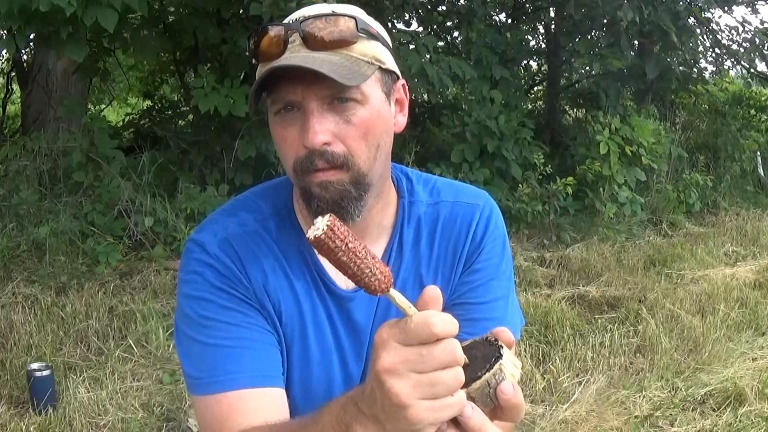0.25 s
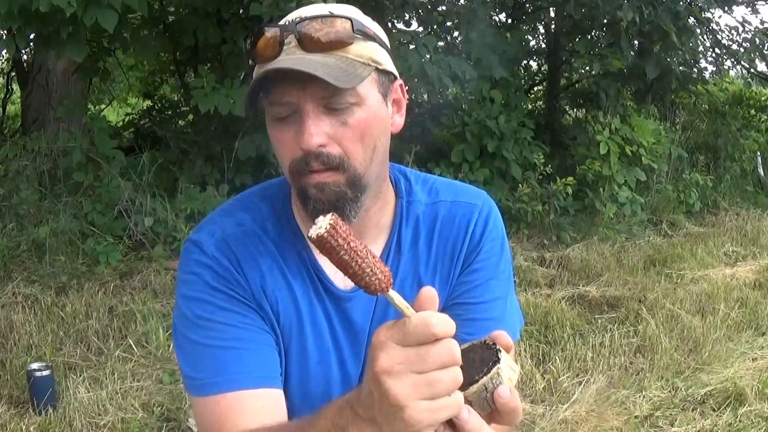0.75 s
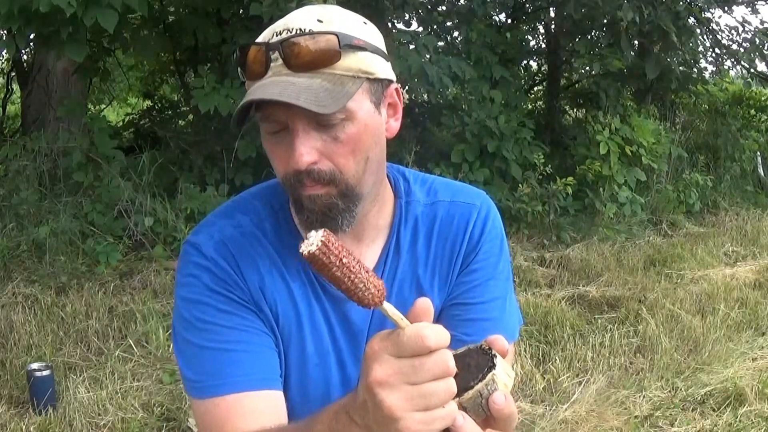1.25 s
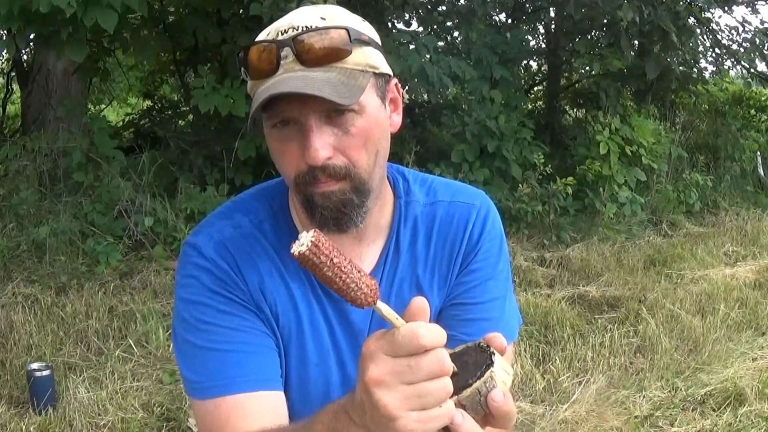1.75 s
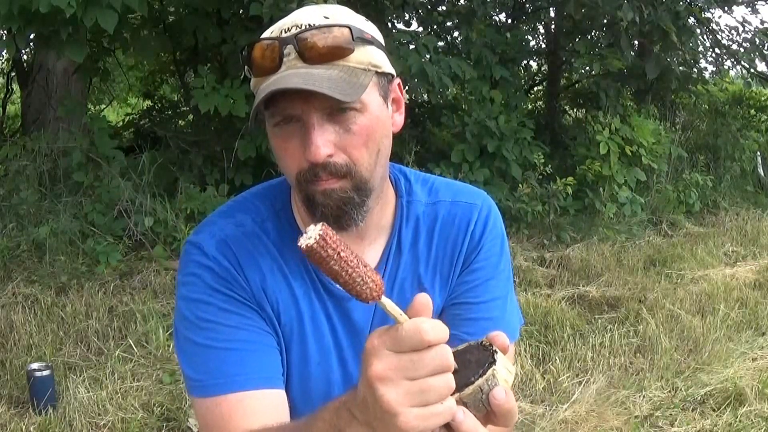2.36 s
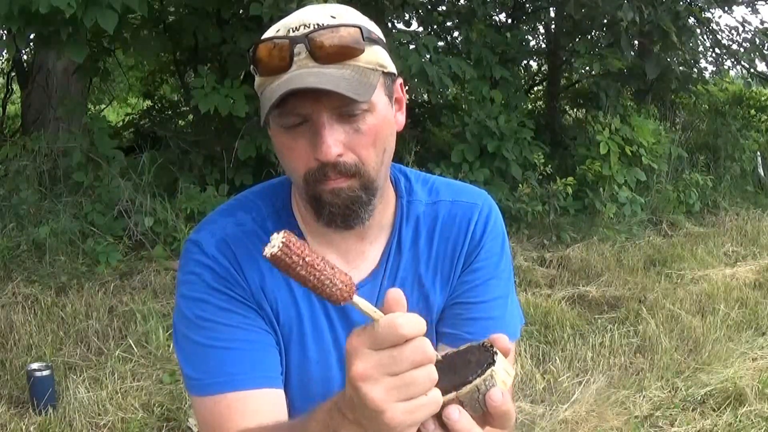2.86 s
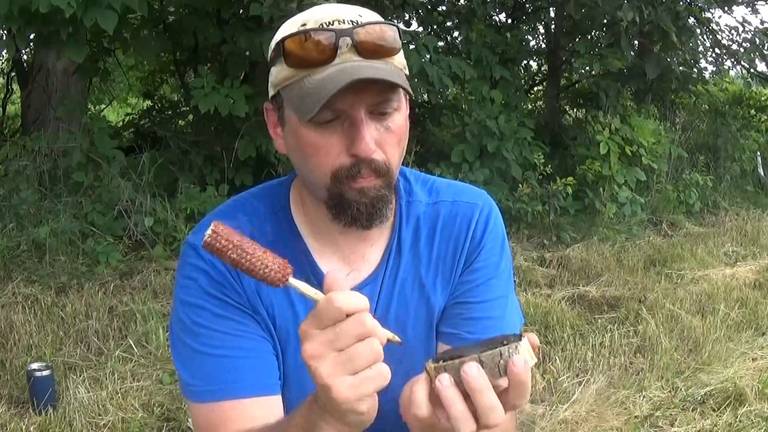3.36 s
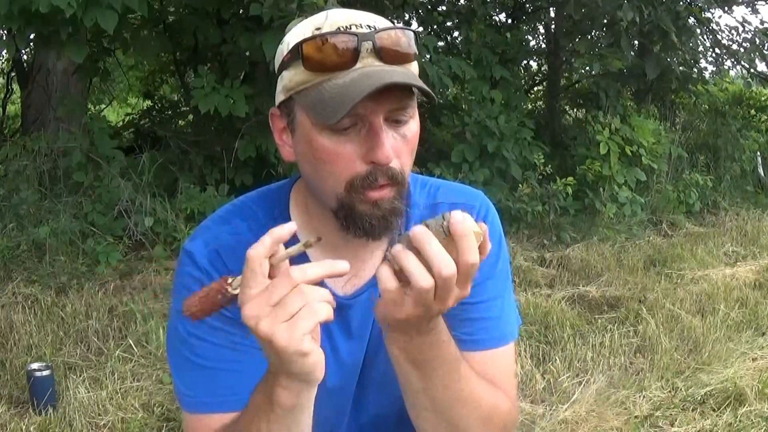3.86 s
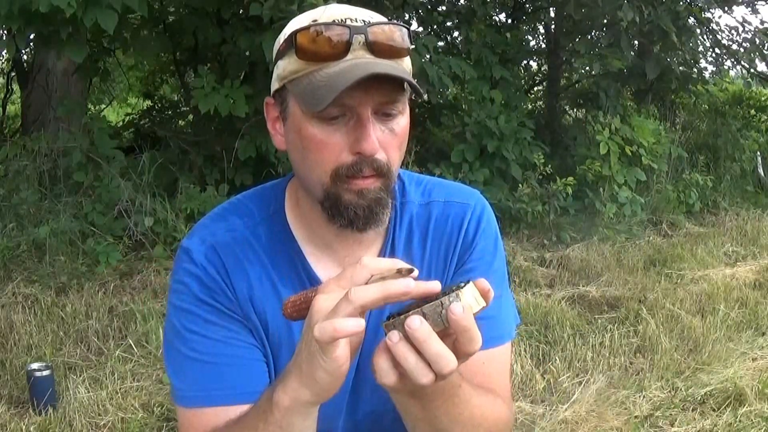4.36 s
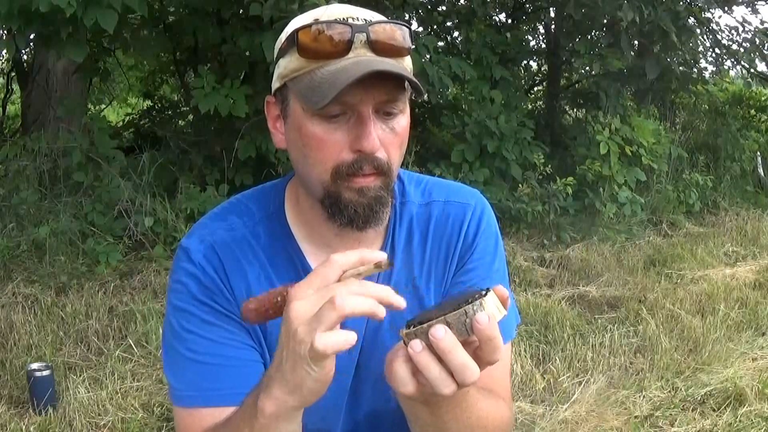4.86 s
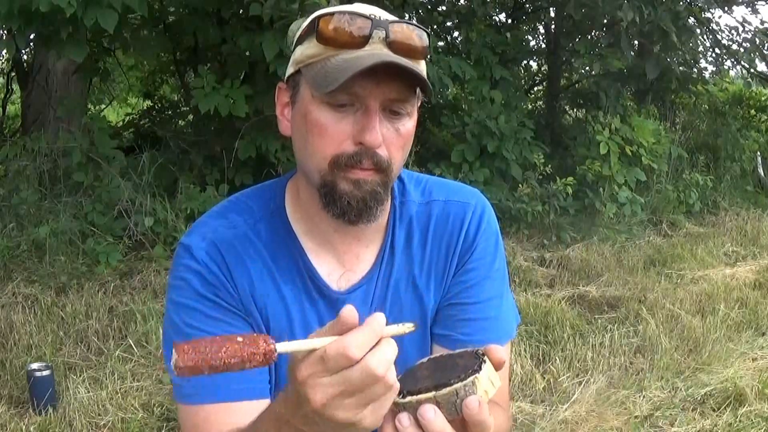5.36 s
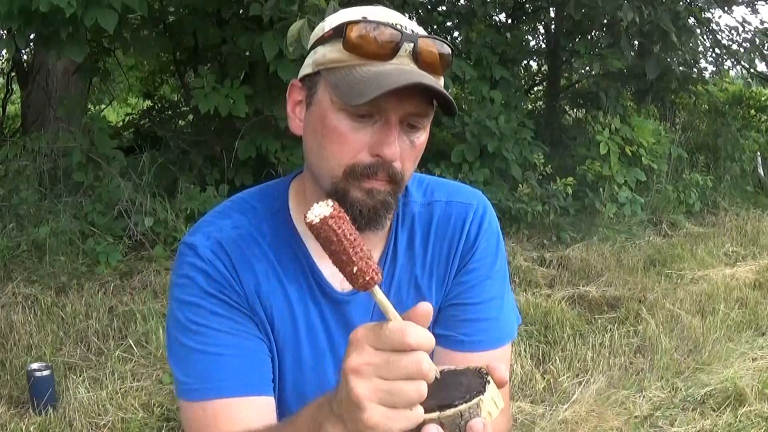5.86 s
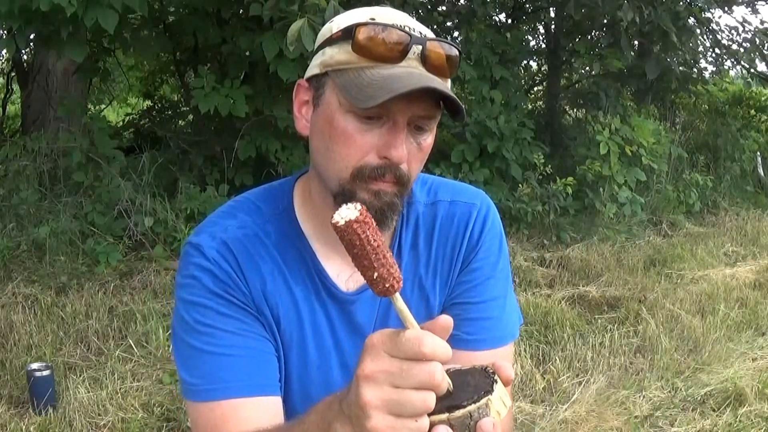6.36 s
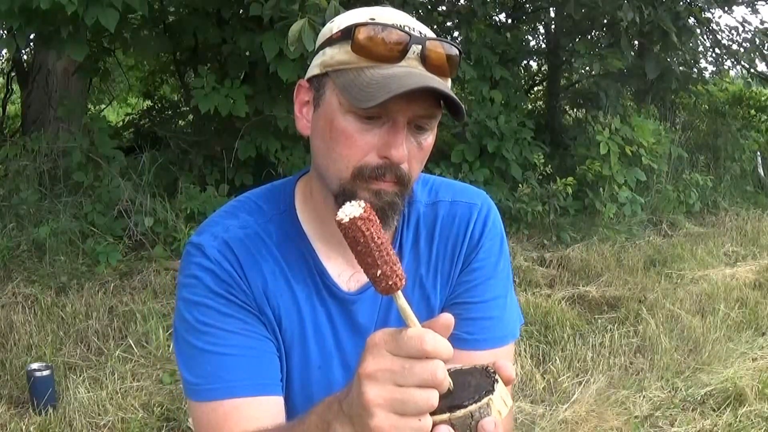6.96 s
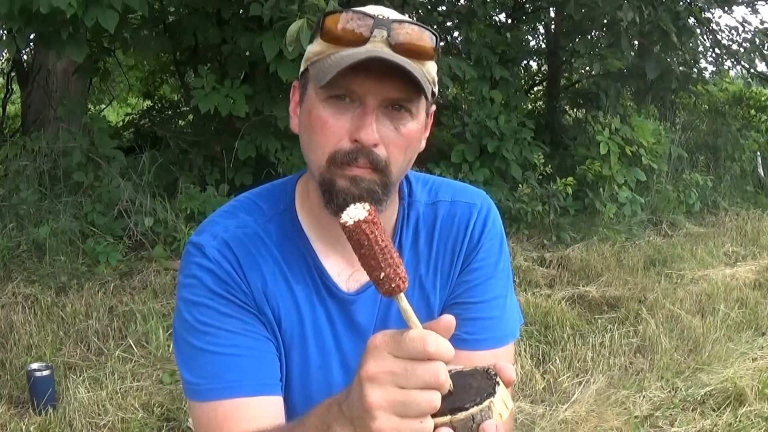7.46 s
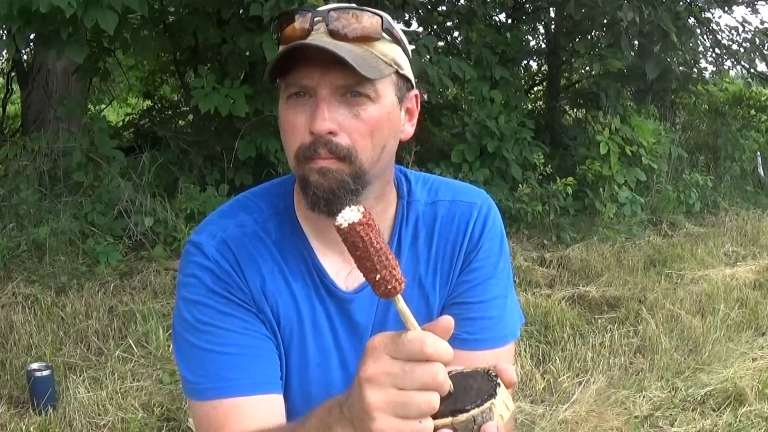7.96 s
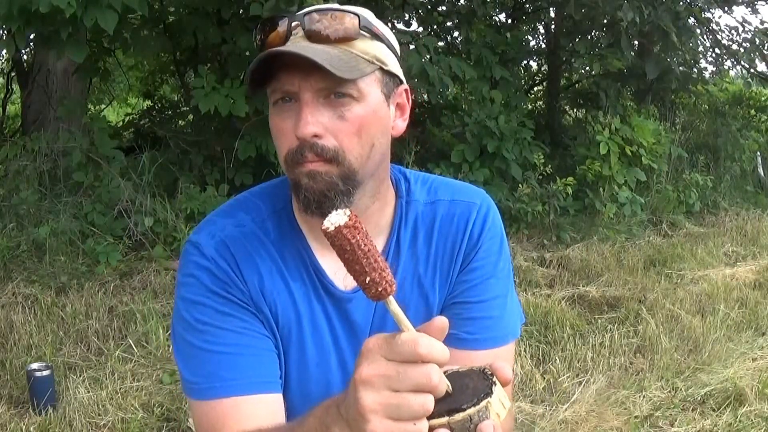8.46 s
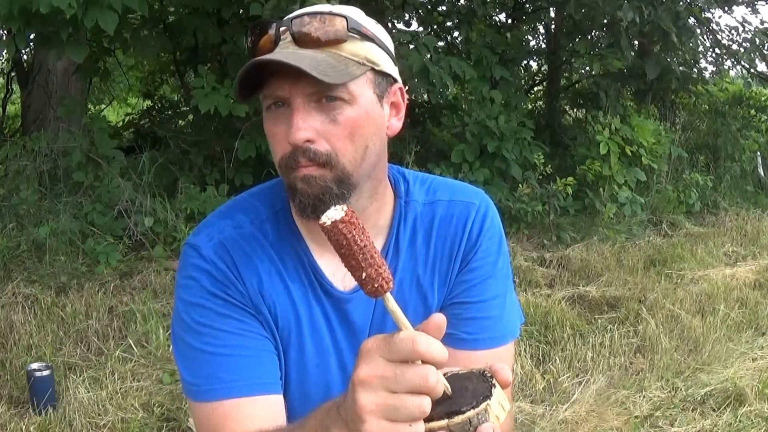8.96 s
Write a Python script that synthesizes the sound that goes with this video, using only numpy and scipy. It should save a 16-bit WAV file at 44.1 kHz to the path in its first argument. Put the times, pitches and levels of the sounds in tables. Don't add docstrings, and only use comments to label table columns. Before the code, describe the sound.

Ten brisk, raspy slate-and-peg yelps, a pause filled with near birdsong, then four quieter strokes outdoors among insects and rustling leaves.

```python
import sys
import numpy as np
from scipy import signal
from scipy.fft import rfft, irfft
from scipy.io import wavfile
from scipy.ndimage import uniform_filter1d

SR = 44100
rng = np.random.default_rng(int(sys.argv[2]) if len(sys.argv) > 2 else 0)


def master(y):
    cut = np.clip(np.atleast_2d(y).T, -1, 1)
    pcm = np.round(cut * 32767)
    wavfile.write(sys.argv[1], SR, pcm.astype(np.int16))


def to_linear_factor(level_db):
    exponent = np.asarray(level_db, float) / 20
    return 10 ** exponent


N = 406161

# time_s, pot_level_db, slip_rate_hz
STROKES = [
    [(0.209, -44.5, 561), (0.22, -33, 383), (0.236, -31.5, 329), (0.251, -31.5, 327), (0.266, -27.5, 394),
     (0.275, -30, 475), (0.284, -33, 637), (0.287, -48, 651)],
    [(0.484, -40.5, 539.5), (0.497, -31, 358.7), (0.515, -25, 376.6), (0.53, -28, 420), (0.544, -25, 475),
     (0.555, -28, 540), (0.566, -27.5, 645), (0.578, -40, 754)],
    [(0.767, -45, 599.6), (0.772, -35, 488), (0.78, -28, 375.5), (0.792, -28.5, 318.4), (0.801, -27, 322.7),
     (0.838, -26, 492), (0.854, -32.5, 660), (0.858, -46, 714)],
    [(1.049, -39, 588), (1.055, -31, 441), (1.068, -25.5, 320.5), (1.08, -26, 329), (1.095, -23, 404.5),
     (1.112, -25, 528), (1.124, -25.5, 673), (1.133, -37, 896)],
    [(1.318, -47, 533), (1.327, -33.5, 391), (1.335, -32, 342), (1.358, -28.5, 357.3), (1.385, -29, 430),
     (1.394, -28, 489), (1.403, -33.5, 655), (1.407, -47, 651)],
    [(1.614, -31.5, 604), (1.626, -28.5, 373), (1.638, -22, 370), (1.654, -24, 420), (1.663, -23.5, 487),
     (1.669, -22.5, 576), (1.677, -29, 860), (1.681, -45, 936)],
    [(1.896, -36, 562.5), (1.901, -32.5, 438.5), (1.912, -28.5, 340), (1.935, -22.5, 376),
     (1.953, -25.5, 521), (1.962, -24.5, 660), (1.968, -32, 861), (1.971, -41, 890)],
           [(2.163, -38, 556.5), (2.172, -28.5, 390.5), (2.185, -25, 335.6), (2.201, -21.5, 385.4),
     (2.221, -22.5, 503), (2.231, -24, 642), (2.24, -29, 800), (2.243, -39, 796)],
    [(2.486, -33, 484), (2.488, -25, 472), (2.493, -22.5, 425), (2.499, -24, 433), (2.512, -20.5, 485),
     (2.52, -23.5, 554), (2.528, -25.5, 730), (2.534, -38, 898)],
    [(2.772, -42, 528), (2.774, -37, 516), (2.779, -26, 436), (2.785, -23.5, 410), (2.794, -24.5, 396),
     (2.802, -28.5, 397), (2.817, -26.5, 489), (2.829, -38.5, 646)],
    [(6.954, -55, 704), (6.957, -40, 690), (6.968, -35, 583), (6.974, -33, 580), (6.984, -31, 613),
     (6.989, -37.5, 680), (6.996, -34.5, 804), (7.0, -56, 820)],
    [(7.462, -51, 602), (7.464, -35, 590), (7.471, -36.5, 471), (7.48, -34, 404), (7.492, -31, 491),
     (7.502, -34, 704), (7.506, -41, 900), (7.509, -53, 942)],
    [(7.891, -41, 605), (7.904, -29, 404.5), (7.911, -29.5, 383.5), (7.923, -31.5, 424), (7.949, -27, 656),
     (7.957, -33.5, 675), (7.97, -34, 790), (7.979, -44, 980)],
    [(8.334, -53, 606), (8.337, -34, 578), (8.346, -30, 388), (8.358, -31.5, 331), (8.374, -32, 355),
     (8.383, -28, 389), (8.4, -35, 672), (8.404, -47, 701)],]
# peg_re_pot_peak_db, slate_middle_db, slate_top_db
GRIPS = [(-7, -0.5, -2), (-9, -1.5, -2), (-7.5, 0, 0), (-8, 0.5, 2), (-12, -1, 4.5), (-11, 0, 3),
         (-9.5, 1, 1.5), (-11.5, 1, 4), (-19, 2.5, 3), (-17, 1.5, 2), (-11.5, -2, -0.5), (-9.5, -0.5, 0),
         (-7.5, 0.5, 0), (-6.5, 1, 0)]
# mode_hz, width_hz, first_grip_db, later_grip_db
SLATE_MIDDLE = [(3400, 370, -2.5, 7.5), (3490, 550, 0.5, 6), (4300, 550, 3, -1.5), (5000, 700, 0.5, -5.5),
                (5750, 460, 0.5, -8.5)]
SLATE_TOP = [(6300, 1400, 2.5, -1.1), (7000, 380, 0, -0.31), (7360, 480, 1, 0.13), (8260, 500, -3, 0.46)]
REGRIP_S = 5
POT_FLOOR_HZ = (350, 427)
HOLLOW_HZ, HOLLOW_WIDTH_HZ, HOLLOW_DEPTH = 2746, 570, (0.64, 0.18)


def strokes():
    out = np.zeros(N)
    chance = rng.standard_normal((len(GRIPS), 2, 9))
    slate = SLATE_MIDDLE + SLATE_TOP
    for curve, (peg_db, *slate_db), (shift, more) in zip(STROKES, GRIPS, chance):
        late = int(curve[0][0] > REGRIP_S)
        modes = [(hz * (1 + 0.03 * a), width_hz, dbs[late] + b)
                 for (hz, width_hz, *dbs), a, b in zip(slate, shift, more)]
        bands = modes[:len(SLATE_MIDDLE)], modes[len(SLATE_MIDDLE):]
        at, sound = stroke(motion(curve, peg_db, late), bands, peg_modes(late), slate_db)
        floor = signal.butter(5, POT_FLOOR_HZ[late], "high", fs=SR, output="sos")
        sound = signal.sosfilt(floor, sound)
        hollow = HOLLOW_DEPTH[late] * resonate(sound, HOLLOW_HZ, HOLLOW_WIDTH_HZ)
        out[at:at + len(sound)] += sound - hollow
    return out


PEG_DB_PER_OCTAVE = (-16, -6.5)


def motion(curve, peg_db, late):
    s, db, hz = np.transpose(curve)
    pressure_db = 0.7 * (db - db.max())
    quick_db = PEG_DB_PER_OCTAVE[late] * np.log2(hz / hz.min())
    peg = db.max() + peg_db + pressure_db + quick_db
    t = np.linspace(s[0], s[-1], num=40)
    return np.transpose([t, *(np.interp(t, s, column) for column in (db, hz, peg))])


# mode_hz, width_hz, level_db
POT = [(717, 139, -13), (1104, 170, -6.5), (1529, 271, -2.5), (1722, 212.5, 0), (1904, 114, 2),
       (2163, 73, -9.5), (2424, 126, -10.5)]
JITTER, UNEVEN_DB, GRIT_DB, POT_GRIT_DB, SLATE_GRIT = 0.004, 1.0, -6, -2.5, 0.8


def stroke(rows, slate_bands, shaft, slate_db):
    s, pot_db, slip_hz, peg_db = np.transpose(rows)
    t = s[0] - .03 + np.arange(7000) / SR
    slips, grit = slip_train(np.interp(t, s, slip_hz))
    push = slips + to_linear_factor(POT_GRIT_DB) * grit
    slips = slips + grit

    edges = np.r_[s[0] - .002, s, s[-1] + .002]
    pot = np.interp(t, edges, np.r_[0, to_linear_factor(pot_db), 0])
    peg = np.interp(t, edges, np.r_[0, to_linear_factor(peg_db), 0])
    place = np.clip((t - edges[0]) / (edges[-1] - edges[0]), 0, 1)
    firm = np.sin(np.pi * place ** 0.75).clip(0)

    above = signal.butter(3, 2900, "high", fs=SR, output="sos")
    scrape = slips + SLATE_GRIT * grit
    middle, top = (evened(signal.sosfilt(above, body(scrape, modes))) for modes in slate_bands)
    sound = pot * evened(body(push, POT), size=450)
    sound += to_linear_factor(3.0) * firm ** 0.49 * peg * evened(body(slips, shaft))
    sound += to_linear_factor(slate_db[0] - 12.5) * pot ** 0.65 * peg ** 0.28 * firm ** 0.5 * middle
    sound += to_linear_factor(slate_db[1] - 11.0) * pot ** 0.29 * peg ** 0.66 * firm * top
    return round(t[0] * SR), sound


def slip_train(slip_hz):
    chance = rng.standard_normal((2, len(slip_hz)))
    wobble = rms_one(uniform_filter1d(chance[0], size=120))
    hz = uniform_filter1d(slip_hz, size=180) * (1 + JITTER * wobble)
    turn = 2 * np.pi * np.cumsum(hz) / SR
    k = np.arange(1, 45)[:, None]
    slips = np.sum(np.cos(k * turn) * (k * hz < 13000), axis=0)
    slips *= to_linear_factor(UNEVEN_DB * wobble[::-1])
    grit = to_linear_factor(GRIT_DB) * chance[1] * (1 + np.cos(turn)) ** 2
    return slips, grit


# mode_hz, width_hz, first_grip_db, later_grip_db
PEG = [(9180, 440, -16, 2), (9460, 650, 0.5, 5), (10280, 570, 7, 4.5), (10930, 200, 7, 1.5)]


def peg_modes(late):
    return [(hz, width_hz, dbs[late]) for hz, width_hz, *dbs in PEG]


# start_s, length_s, level_db
DRAGS = [(.01, 0.11, -56), (0.313, 0.086, -56), (0.599, 0.042, -54.5), (0.885, 0.093, -55),
         (1.161, .1, -53), (1.437, 0.055, -50), (1.724, 0.069, -51), (2.002, 0.086, -50.5),
         (2.28, 0.079, -53), (2.568, 0.099, -51), (5.403, .06, -59.5), (6.767, 0.045, -61),
         (7.583, 0.11, -57), (8.015, 0.15, -56.5), (2.45, 0.046, -49), (6.947, .015, -61),
         (8.444, 0.14, -56)]
# freq_hz, density_db_per_hz
DRAG_COLOUR = [(400, -50), (1500, -16), (2500, -18.5), (5000, -14), (8000, -15), (9300, -10), (10500, 1),
               (11200, -6), (11800, -44)]
# start_s, length_s, level_db
WIPE = (5.01, 0.23, -48)
# freq_hz, density_db_per_hz
WIPE_COLOUR = [(700, -15.5), (1500, -5), (2500, -17), (4500, -2), (7000, -7), (8500, 2), (11200, -3.5),
               (11800, -40)]


def drags():
    tip = to_linear_factor(1.0) * sum(swell(*row) for row in DRAGS) * coloured(DRAG_COLOUR, channels=1)
    return tip + swell(*WIPE) * coloured(WIPE_COLOUR, channels=1)


def swell(start_s, length_s, level_db):
    place = np.clip((np.arange(N) / SR - start_s) / length_s, 0, 1)
    return to_linear_factor(level_db) * np.sin(np.pi * place ** 0.57)


# start_s, peak_db, ring_hz
KNOCKS = [(0.001, -59, 1940), (0.001, -62, 1010), (0.713, -55.5, 1130), (0.714, -53, 1750),
          (0.906, -60.5, 445), (0.929, -65, 473), (0.971, -64, 424), (2.745, -57, 1200),
          (3.615, -53.5, 1190), (3.978, -60, 410), (4.023, -62, 499), (4.164, -60, 580),
          (4.208, -62.5, 368), (4.273, -63, 500), (4.582, -63.5, 510), (4.752, -62.5, 560),
          (4.795, -62, 546), (5.009, -61, 1450), (5.369, -67, 1000), (6.855, -63.5, 452), (7.144, -66, 611)]
# start_s, peak_db
TICKS = [(.192, -40), (.945, -52), (.976, -48), (0.997, -40), (1.007, -16), (1.023, -44), (2.334, -30.5),
         (4.496, -44), (4.585, -38), (6.442, -46), (6.553, -40), (6.61, -45)]


def knocks():
    out, t = np.zeros(N), np.arange(1500) / SR
    for s, db, hz in KNOCKS:
        burst = rng.standard_normal(1500) * np.exp(-t / 0.0037)
        ring = resonate(burst, hz, width_hz=150)
        out[round(s * SR):][:1500] += to_linear_factor(db + 13.5) * ring / np.abs(ring).max()
    for s, db in TICKS:
        crack = np.diff(rng.standard_normal(1501)) * np.exp(-t / 0.002)
        pot = resonate(crack, 2400, width_hz=980)
        peg = body(crack, peg_modes(0))
        out[round(s * SR):][:1500] += to_linear_factor(db) * (0.29 * crack + 1.6 * pot + .5 * peg)
    return out


WOOD_T60_S = 0.38


def birds():
    near, near_spread = near_bird()
    far, far_spread = far_birds()
    near_echo = wood_echo(near_spread, WOOD_T60_S)
    far_echo = wood_echo(far_spread, WOOD_T60_S * 1.5)
    return (pan(near, left_db=-9.5) + pan(near_echo, left_db=1)
            + pan(far, left_db=1.5) + to_linear_factor(-2.5) * far_echo)


# start_s, length_s, from_hz, to_hz, level_db
NEAR_GLIDES = [(2.04, 0.032, 3276, 4490, -40.5), (2.25, 0.058, 3000, 5350, -56.5),
               (2.32, 0.055, 3180, 4700, -54.5), (2.422, 0.03, 3390, 4230, -39.5),
               (2.632, 0.036, 4270, 3110, -45.5), (2.705, 0.033, 3400, 4340, -37),
               (2.74, 0.044, 4510, 5840, -47), (3.075, .03, 3940, 4300, -50),
               (3.1, 0.037, 4240, 3106, -45.5), (3.14, .03, 3100, 3770, -51),
               (3.105, 0.073, 6180, 5810, -41), (3.358, 0.018, 5770, 8200, -55),
               (4.297, 0.037, 2930, 4150, -42), (4.63, 0.0078, 6570, 5460, -46),
               (5.08, 0.032, 3380, 5000, -46), (5.111, 0.014, 3570, 5190, -45),
               (5.128, 0.019, 3700, 4960, -47), (5.144, .013, 3600, 4500, -53.5),
               (4.377, 0.0092, 5700, 7000, -55), (2.612, 0.032, 4270, 4280, -51),
               (5.515, 0.052, 2770, 4270, -56)]
NEAR_TRILLS = [(2.82, 0.13, 4870, 6010, -44.5), (3.165, 0.073, 3804, 4490, -34),
               (4.41, 0.27, 6680, 7100, -61), (4.61, 0.023, 4970, 6300, -48)]
NEAR_BUZZES = [(2.82, 0.23, 3040, 5220, -49.5), (2.85, 0.19, 5260, 3680, -61),
               (2.93, 0.096, 6480, 4690, -49), (3.165, 0.088, 6020, 4300, -45),
               (3.25, 0.061, 3510, 5570, -45), (4.39, 0.18, 6150, 7830, -51)]
NEAR_TRILL_PER_S, NEAR_BUZZ_PER_S = 58, 110
# start_s, level_db
PHRASE_STARTS = [(3.4, -1), (3.585, -2.5), (3.769, -3), (3.956, -2)]
# length_s, from_hz, to_hz, sweeps_per_s, level_db
PHRASE_BUZZ = (0.0537, 3799, 6002, 154.5, -36.5)
# lag_s, length_s, from_hz, to_hz, level_db
PHRASE = [(0.08, 0.0068, 6820, 5440, -39), (0.103, 0.018, 3485, 2910, -38), (.132, .011, 3550, 2850, -39)]


def near_bird():
    glides = [(s + lag, *rest, db + more) for s, more in PHRASE_STARTS for lag, *rest, db in PHRASE]
    glides = glides[:-2]
    *buzz, buzz_db = PHRASE_BUZZ
    buzzes = [(s, *buzz, buzz_db + more) for s, more in PHRASE_STARTS]
    notes = (swept(NEAR_GLIDES, 0) + swept(NEAR_TRILLS, NEAR_TRILL_PER_S)
             + swept(NEAR_BUZZES, NEAR_BUZZ_PER_S))
    loose, spread = sing(notes, turned_away=0.26, waver_hz=27.6)
    figure, _ = sing(buzzes + swept(glides, 0), turned_away=0, waver_hz=15.0, uneven=.16, pulsed=.9)
    chips = chatter()
    return loose + figure + chips, spread + to_linear_factor(-2) * figure + to_linear_factor(-3.5) * chips


# start_s, period_s, length_s, foot_hz, top_hz, level_db
CHATTER = (4.0775, .0174, .011, 1700, 2850, -46)


def chatter():
    start, period, length, foot_hz, top_hz, db = CHATTER
    t = np.arange(N) / SR - start
    place = np.clip(t % period / length, 0, 1)
    arch = np.sin(np.pi * place).clip(0) * (t > 0) * (t < 10 * period)
    hz = foot_hz + (top_hz - foot_hz) * (1 - np.abs(2 * place - 1))
    tone = np.sin(2 * np.pi * np.cumsum(hz) / SR)
    rise_fall = np.sin(np.pi * np.clip(t / period / 10, 0, 1)).clip(0) ** .4
    return to_linear_factor(db) * arch * rise_fall * tone


# start_s, length_s, pitch_hz, level_db
FAR_WHISTLES = [(0.57, 0.14, 6830, -71), (0.738, 0.088, 3330, -54.5), (0.818, 0.074, 3330, -59),
                (0.905, 0.062, 6200, -60), (0.919, 0.14, 6520, -61), (1.129, 0.15, 3323, -56.5),
                (1.947, 0.051, 6040, -52.5), (2.095, .02, 7350, -60), (2.124, 0.037, 3860, -49.5),
                (2.362, 0.067, 6050, -54.5), (2.509, 0.065, 4648, -43.5), (2.995, 0.041, 4747, -40.5),
                (4.295, 0.073, 4810, -59), (4.57, 0.053, 4836, -51.5), (4.609, 0.028, 4660, -54.5),
                (4.705, 0.14, 7775, -53), (4.736, 0.081, 4750, -54.5), (4.865, 0.045, 4850, -56),
                (4.901, 0.043, 4750, -49.5), (5.009, 0.22, 4693, -53.5), (5.62, 0.13, 7400, -67.5),
                (5.65, 0.074, 7840, -62.5), (5.945, 0.51, 1065, -73.5), (7.169, 0.091, 4180, -67),
                (4.724, 0.14, 3900, -70), (7.694, 0.15, 5860, -71.5), (7.98, .26, 5770, -81),
                (8.955, 0.026, 4580, -69.5), (8.035, .07, 5025, -63.5), (8.506, 0.2, 5000, -62.5),
                (9.001, 0.034, 7120, -61.5)]
# start_s, length_s, from_hz, to_hz, level_db
FAR_GLIDES = [(5.876, .06, 3240, 3540, -61.5), (.005, 0.035, 3150, 3070, -60),
              (.143, 0.012, 3500, 3030, -54.5), (0.289, 0.011, 3580, 3050, -54),
              (0.424, 0.016, 3550, 2910, -56), (4.896, 0.021, 3840, 2430, -53.5),
              (4.958, 0.054, 5900, 5890, -53.5), (5.015, 0.022, 6000, 7300, -52),
              (5.817, 0.0356, 2960, 2140, -60.5), (4.852, 0.0174, 3760, 2930, -64),
              (4.955, 0.013, 6800, 6000, -70), (6.785, .035, 5500, 4060, -69),
              (8.907, 0.054, 3100, 4500, -72.5)]
FAR_WARBLES = [(6.8, 0.11, 4340, 3690, -63), (7.3, 0.33, 3940, 4210, -63)]
FAR_TRILLS = [(.033, 0.056, 6400, 5000, -54.5), (0.2, 0.054, 6200, 4600, -58),
              (0.5, 0.045, 7500, 5200, -50), (0.034, 0.073, 2800, 4000, -58),
              (.316, 0.069, 6400, 5000, -56), (5.23, 0.22, 2580, 2480, -57), (8.26, 0.34, 2900, 3900, -64),
              (7, 0.46, 3600, 4300, -70), (8.9, 0.13, 3000, 4500, -60.5), (8.56, 0.071, 3500, 4800, -62.5)]
FAR_BUZZES = [(0.53, 0.095, 3960, 3600, -53.5), (5.95, .08, 3350, 3800, -60), (6.445, .06, 5800, 5350, -65),
              (6.165, 0.036, 6700, 6300, -67), (.6, .09, 4100, 4800, -62), (2.355, .1, 4100, 5300, -50),
              (2.9, .16, 2500, 3600, -58), (.68, 1, 4030, 5400, -57), (1.45, 0.87, 3200, 3830, -60.5)]
FAR_WARBLE_PER_S, FAR_TRILL_PER_S, FAR_BUZZ_PER_S = 8.6, 50, 110
WHISTLE_SAG_PER_S = 0.0634
# start_s, level_db
FAR_SONG_STARTS = [(8.0, -2), (8.572, -2.5)]
# lag_s, length_s, from_hz, to_hz, level_db
FAR_SONG = [(0, 0.068, 4700, 4770, -59.5), (0.105, 0.045, 5330, 6000, -61), (0.151, .03, 5950, 4470, -57),
            (.19, 0.075, 4460, 4410, -62)]
# first_s, last_s, period_s, gap_s
PEEP_PAIRS = (6.045, 6.76, .0883, .023)


def far_birds():
    whistles = []
    for s, length, hz, db in FAR_WHISTLES:
        sag = WHISTLE_SAG_PER_S * length / 2
        whistles.append((s, length, hz * (1 + sag), hz * (1 - sag), db))
    calls = (swept(whistles + FAR_GLIDES, 0) + swept(FAR_WARBLES, FAR_WARBLE_PER_S)
             + swept(FAR_TRILLS, FAR_TRILL_PER_S) + swept(FAR_BUZZES, FAR_BUZZ_PER_S))
    tune = [(s + lag, *rest, db + more) for s, more in FAR_SONG_STARTS for lag, *rest, db in FAR_SONG]
    first, last, period, gap = PEEP_PAIRS
    peeps = [(s + lag, .009, 3900, 4300, -60 - 5 * (s - first))
             for s in np.arange(first, last, period) for lag in (0, gap)]

    far, far_spread = sing(calls, turned_away=0.095, waver_hz=40.2)
    hidden, hidden_spread = sing(swept(tune, 0), turned_away=0.27, waver_hz=45)
    close, close_spread = sing(swept(peeps, 0), turned_away=0, waver_hz=25)
    spread = far_spread + to_linear_factor(-1.5) * hidden_spread + to_linear_factor(-7) * close_spread
    return far + hidden + close, spread


def swept(table, per_s):
    return [(*row, per_s, db) for *row, db in table]


SLOW_PER_S = 75


def sing(notes, turned_away, waver_hz, uneven=.3, pulsed=0.4):
    direct, spread = np.zeros((2, N))
    for s, length, from_hz, to_hz, per_s, db in notes:
        t = np.arange(round(length * SR)) / SR
        slow = per_s < SLOW_PER_S
        chance = rng.standard_normal((2, len(t) + 1000))
        chance = uniform_filter1d(chance, size=400)[:, :len(t)] * 20
        arch = np.sin(np.pi * t / length)
        if per_s:
            rate = per_s * (1 + (0.04 if slow else uneven) * chance[0])
            place = np.cumsum(rate / SR) % 1
            shape = arch ** 0.7 * np.sin(np.pi * place) ** (1.6 if slow else pulsed)
        else:
            place = t / length
            shape = arch ** 0.43
        hz = from_hz + (to_hz - from_hz) * place + waver_hz * chance[0]
        tone = np.sin(2 * np.pi * np.cumsum(hz) / SR)
        note = np.sqrt(2) * to_linear_factor(db + 2.16 * chance[1]) * shape * tone
        spread[round(s * SR):][:len(t)] += note
        direct[round(s * SR):][:len(t)] += note * to_linear_factor(turned_away * min(db + 48.0, 8.0))
    return direct, spread


def wood_echo(x, t60_s):
    t = np.arange(SR) / SR
    answer = rng.standard_normal((3, SR)) * to_linear_factor(-60 * t / t60_s) * (1 - np.exp(-t / 0.00087))
    answer = (answer[:2] + 1.22 * answer[2]) / np.sqrt(np.sum(answer ** 2) / 2)
    return signal.fftconvolve(x[None], answer, axes=1)[:, :N]


PULSE_HZ, PULSE_PER_S, PULSE_DB = 2600, 29.97, -62


def faint_pulses():
    t = np.arange(N) / SR
    gate = np.exp(-((t * PULSE_PER_S + 0.655) % 1 - .5) ** 2 / 0.0052)
    rasp = rms_one(resonate(resonate(rng.standard_normal(N), 2970, 500), 2970, 500))
    pulse_tone = np.sin(2 * np.pi * PULSE_HZ * t) + 0.51 * rasp
    return pan(to_linear_factor(PULSE_DB) * gate * pulse_tone, left_db=-1.0)


# freq_hz, density_db_per_hz
AIR = [(15, -46), (30, -45), (55, -9), (118, -8), (372, -3.5), (492, -1), (840, -1.5), (1230, -3),
       (2510, -6), (3970, -5.5), (5530, -10), (11000, -15.5), (14300, -57)]
# time_s, level_db
AIR_LEVEL = [(0.0, -71.5), (0.82, -70.5), (0.92, -70), (1.67, -70.5), (4.03, -68.5), (7.03, -73.5),
             (7.41, -74), (9.21, -72)]
INSECT_HISS = [(0, -63), (2.7, -59), (2.95, -56), (4.7, -58.5), (6.25, -63), (6.4, -71.5), (9.21, -67.5)]


def air():
    t = np.arange(N) / SR
    insects_hz_db = [(6000, -28), (8500, -12.5), (9600, -1.5), (11200, -1.0), (11800, -44)]
    chorus_db = np.interp(t, *np.transpose(INSECT_HISS)) - 2.5
    leaves_db = np.interp(t, *np.transpose(AIR_LEVEL)) + 11.5
    chorus = to_linear_factor(chorus_db) * coloured(insects_hz_db, channels=2)
    return to_linear_factor(leaves_db) * coloured(AIR, channels=2) + chorus


# freq_hz, left_right_likeness
LIKENESS = [(60, 1), (170, 0.71), (490, 0.29), (1420, 0.082), (4070, 0.47), (11700, 0.84)]


def coloured(spectrum, channels):
    hz = np.maximum(np.fft.rfftfreq(N, 1 / SR), 1)
    mid, side = rfft(rng.standard_normal((2, N))) * to_linear_factor(at_hz(spectrum, hz))
    if channels == 1:
        return rms_one(irfft(mid, N))
    alike = np.clip(at_hz(LIKENESS, hz), 0, 1)
    pair = np.sqrt(1 + alike) * mid + np.sqrt(1 - alike) * side * [[1], [-1]]
    return rms_one(irfft(pair, N))


def at_hz(points, hz):
    point_hz, value = np.transpose(points)
    return np.interp(np.log(hz), np.log(point_hz), value)


def resonate(x, hz, width_hz):
    r = np.exp(-np.pi * width_hz / SR)
    zeros = np.array([1, 0, -1]) * (1 - r * r) / 2
    return signal.lfilter(zeros, [1, -2 * r * np.cos(2 * np.pi * hz / SR), r * r], x)


def body(x, modes):
    return sum((-1) ** k * to_linear_factor(db) * resonate(x, hz, width_hz)
               for k, (hz, width_hz, db) in enumerate(modes))


def evened(x, size=1000):
    return x / np.sqrt(uniform_filter1d(x ** 2, size=size) + 1e-9)


def rms_one(x):
    return x / np.sqrt(np.mean(x ** 2) + 1e-20)


def pan(x, left_db):
    return x * to_linear_factor([[left_db / 2], [-left_db / 2]])


def scene():
    hands = strokes() + drags() + knocks()
    near_echo = to_linear_factor(-19.0) * wood_echo(hands, 0.083)
    return pan(hands, left_db=-.6) + near_echo + birds() + faint_pulses() + air()


def band_limit(x):
    return signal.sosfilt(signal.butter(12, 12290, fs=SR, output="sos"), x)


CUTOFF_HZ = 11026


def record(dry):
    steep = signal.ellip(9, .5, 20, CUTOFF_HZ, fs=SR, output="sos")
    deep = signal.cheby2(8, 40, CUTOFF_HZ * 1.174, fs=SR, output="sos")
    mix = signal.sosfilt(deep, signal.sosfilt(steep, dry))
    return band_limit(mix)


dry = scene()
out = record(dry)
master(out)
```